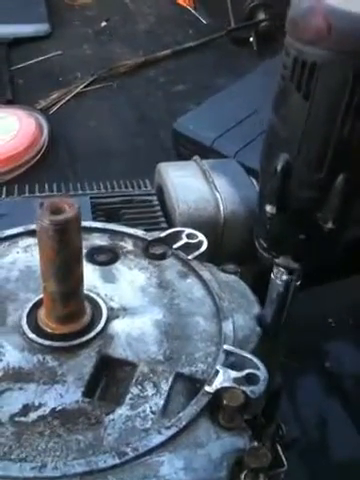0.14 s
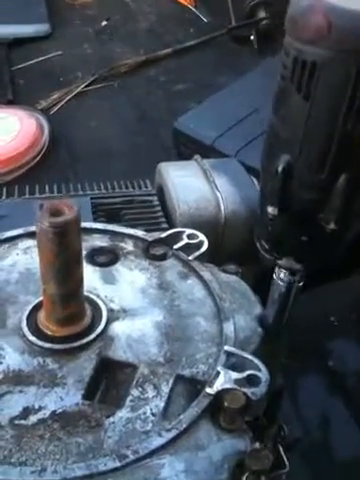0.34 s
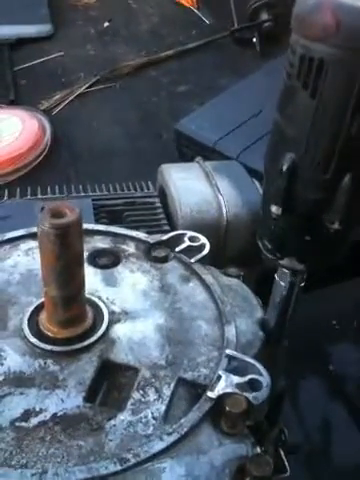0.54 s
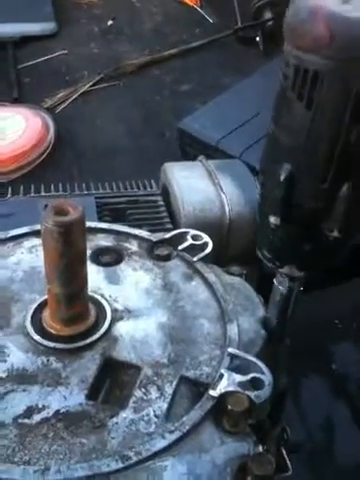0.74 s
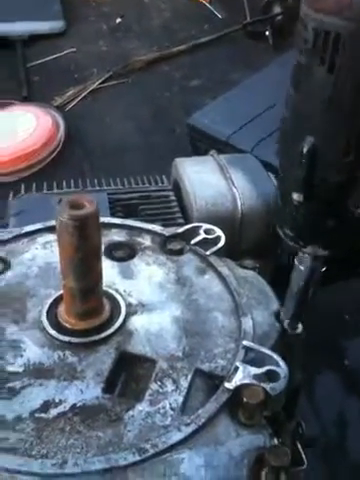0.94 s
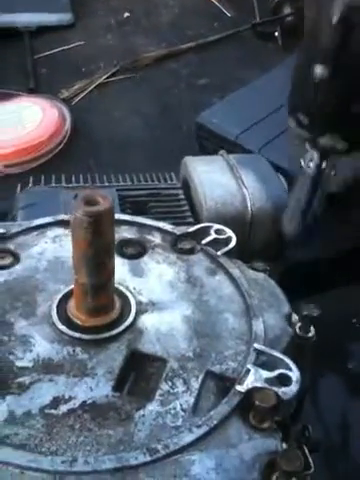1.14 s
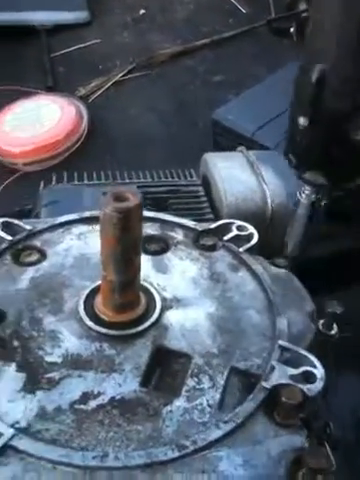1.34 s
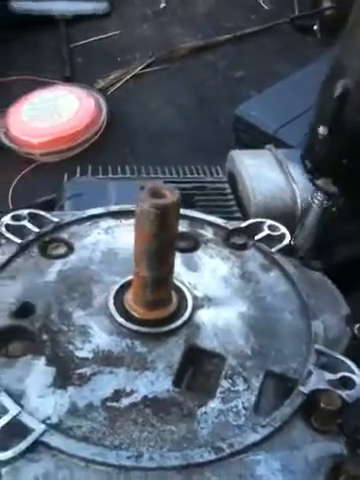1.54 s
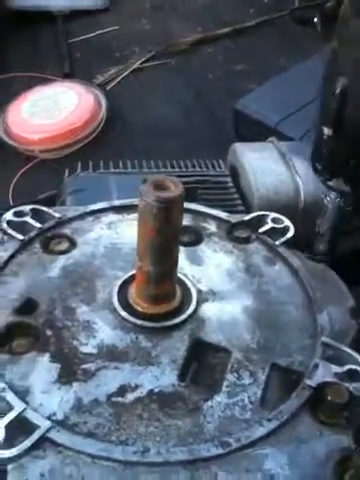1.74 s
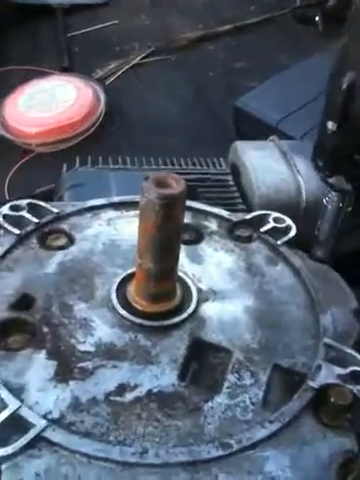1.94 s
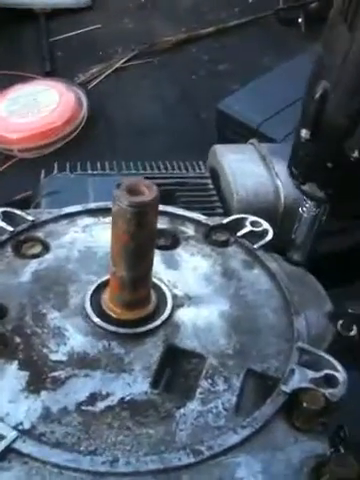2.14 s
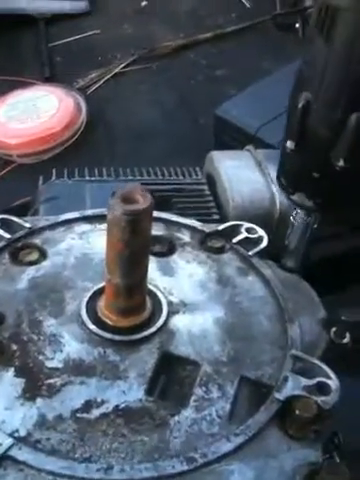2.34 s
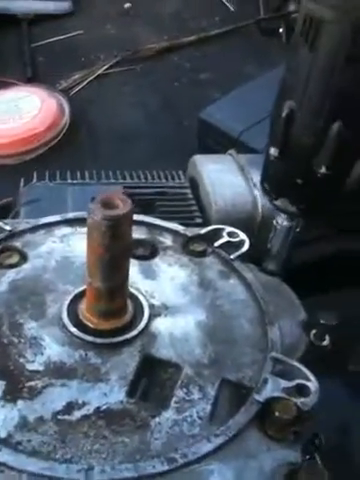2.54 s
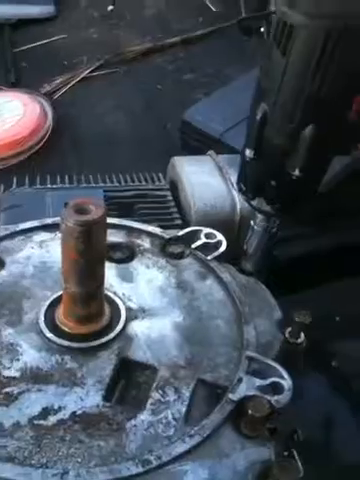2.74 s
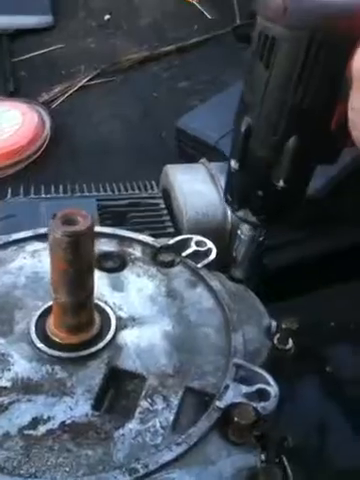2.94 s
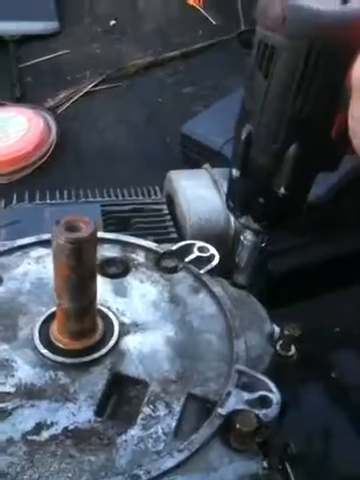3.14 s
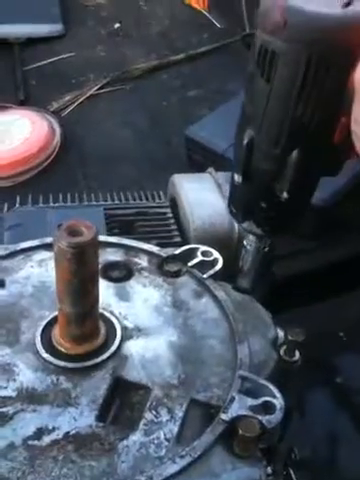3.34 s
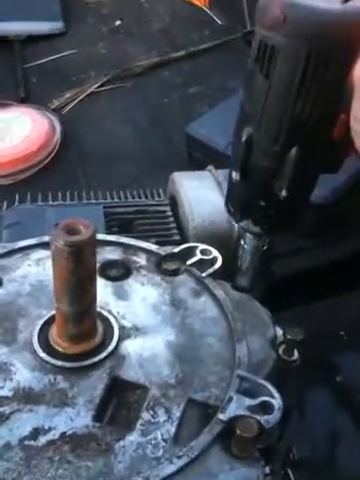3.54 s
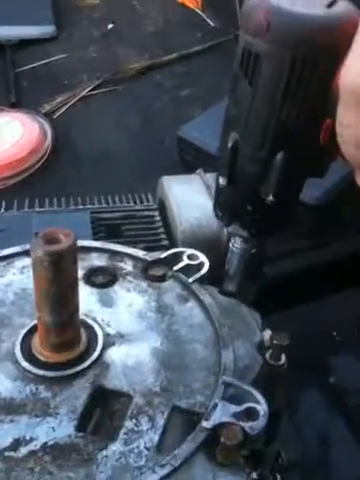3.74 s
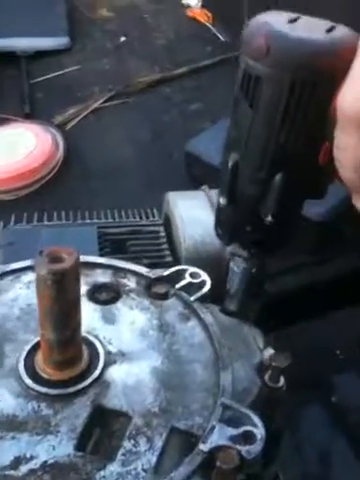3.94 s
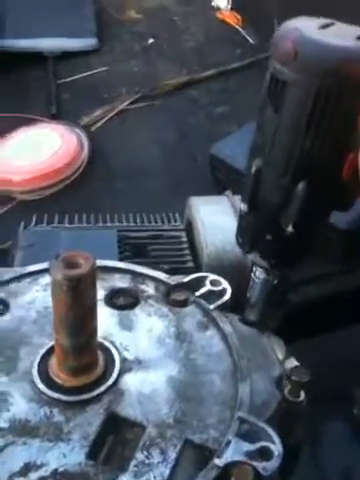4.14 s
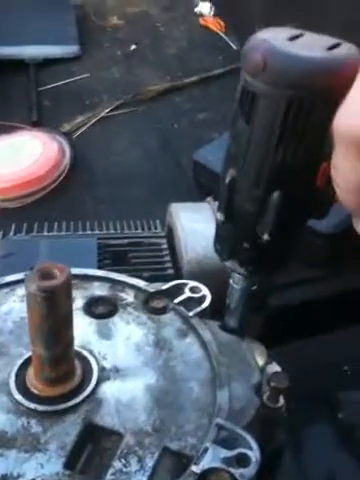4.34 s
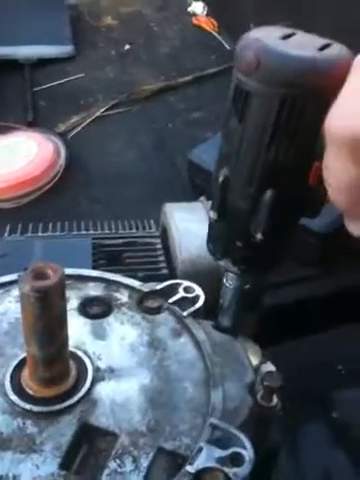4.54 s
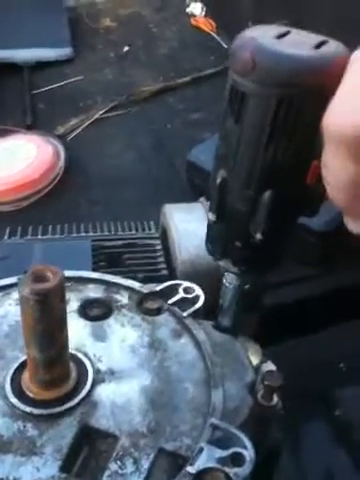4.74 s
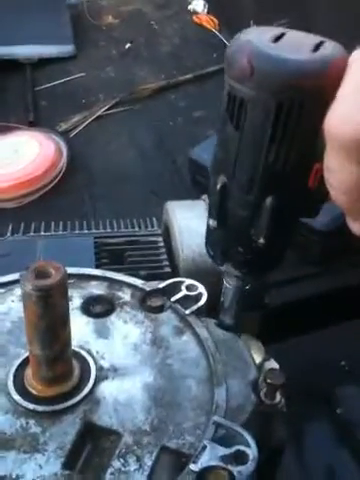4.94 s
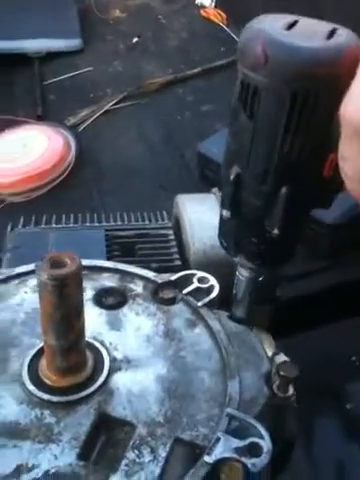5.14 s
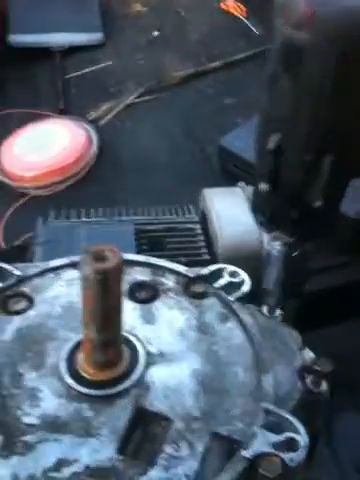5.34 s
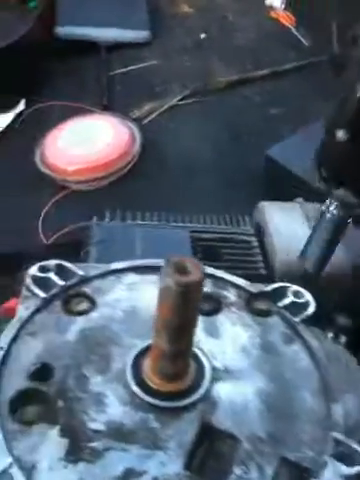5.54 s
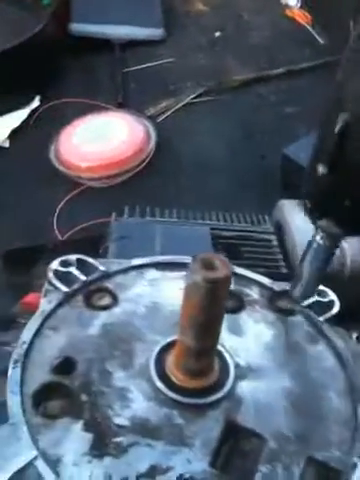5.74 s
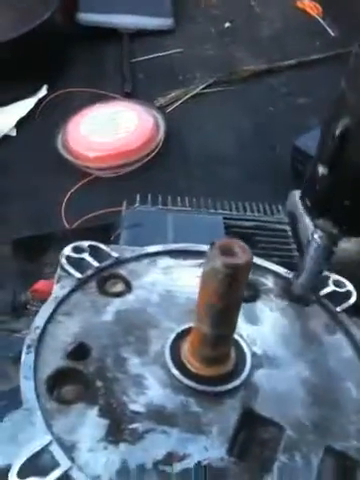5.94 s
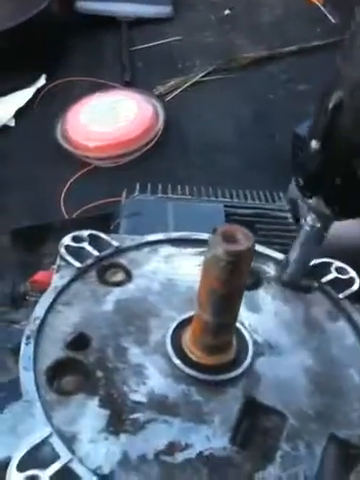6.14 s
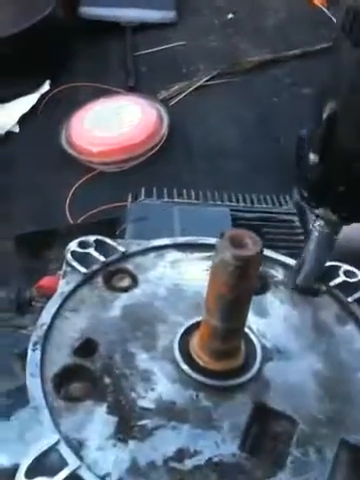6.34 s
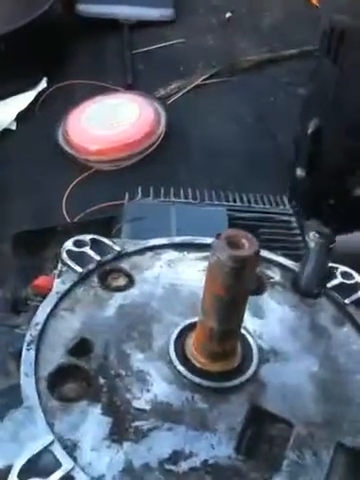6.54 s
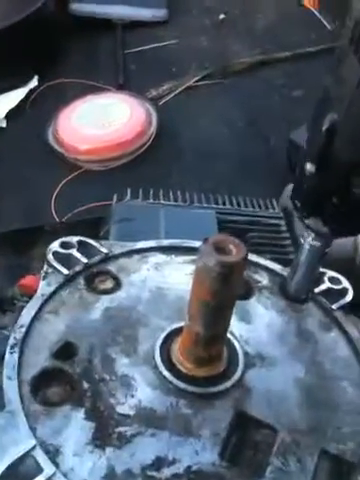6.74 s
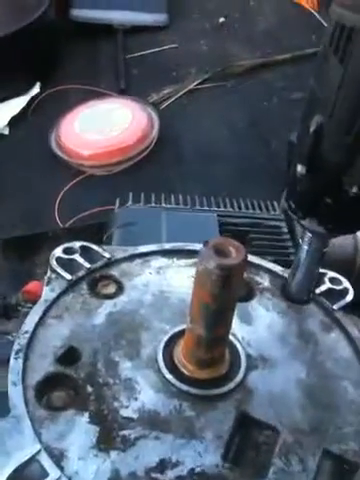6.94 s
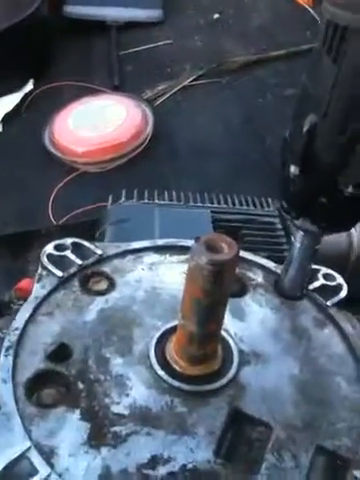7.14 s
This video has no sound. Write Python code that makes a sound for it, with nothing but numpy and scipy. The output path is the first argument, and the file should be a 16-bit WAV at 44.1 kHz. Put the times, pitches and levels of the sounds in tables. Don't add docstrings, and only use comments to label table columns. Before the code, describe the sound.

A cordless impact wrench hammers harshly in three bursts, its whine climbing as bolts loosen, with metallic socket clicks in the gaps.

```python
import sys
import numpy as np
from scipy import signal
from scipy.fft import rfft, irfft, next_fast_len
from scipy.io import wavfile
from scipy.ndimage import uniform_filter1d

SR = 44100
rng = np.random.default_rng(int(sys.argv[2]) if len(sys.argv) > 2 else 0)


def attenuation_scalar(level_db):
    decades = np.asarray(level_db, float) / 20
    return 10 ** decades


def transcribe(u):
    v = np.clip(np.atleast_2d(u).T, -1, 1)
    q = np.round(v * 32767).astype(np.int16)
    wavfile.write(sys.argv[1], SR, q)


N = 321312
T = np.arange(N) / SR

# frequency in Hz, level in dB per Hz.
YARD_NOISE = [(40, -56), (149, -5.5), (190, -15), (440, -19.5), (640, -21), (3200, -38), (6770, -33),
              (15600, -75)]
# frequency in Hz, level in dB.
MOTOR_HUM = [(120, -55.5), (150.5, -52), (204, -54.5), (296, -69.5), (447, -60)]
YARD_DB = -55

# time in seconds, length in seconds, push in dB, ripple in Hz.
AIR_PUFFS = [(0.028, 0.013, 8, 210), (0.199, 0.0093, 1, 230), (0.291, 0.0049, 0, 219.7),
             (0.36, 0.012, 8, 207.3), (0.45, 0.0064, -14, 260), (0.982, 0.018, -10, 205),
             (2.276, 0.013, 9.5, 200), (2.344, 0.0074, -1, 216.8), (2.632, 0.0094, 2, 350),
             (2.717, 0.011, -6, 202.6), (3.012, 0.0061, 7, 249), (3.267, 0.012, 1, 195.4),
             (3.758, 0.0094, 7, 230.6), (3.871, 0.0059, -0.5, 218), (4.241, 0.0074, -0.5, 209.5),
             (4.282, 0.007, -5.5, 221), (6.849, .008, -9.5, 217.6), (6.954, 0.0099, -7.5, 220)]
PUFF_RIPPLE, PUFF_FLUTTER, PUFF_HISS, PUFF_DB = 0.35, 0.15, 0.15, -5
BUFFET_DB = 3.5
FREE_BUFFET_DB = -9

# frequency in Hz, width in Hz, level in dB.
ENGINE_BLOCK = [(330, 130, -0.5), (660, 440, 4), (1150, 2230, 0.5)]
CASTING = [(1890, 23, 2), (2640, 1100, 0), (3296, 79, 1), (3236, 180, 0), (4025, 1710, 0), (4300, 51, 3.5)]
ANVIL = [(4120, 690, -8), (5525, 830, -2.5), (5760, 87, 6.5), (6123, 280, -5), (6450, 130, 6.5),
         (7110, 500, 0.5), (7170, 22, -2), (7130, 2820, -5)]
SOCKET = [(8220, 390, 1), (9000, 2870, 1.5), (10100, 3700, 2), (13000, 7300, -7.5)]
# frequency in Hz, level in dB, time to fall 60 dB in seconds.
STEEL_NOTES = [(610.2, -13, 0.08), (964, -8.5, 0.2), (1820, -10.5, 0.12), (2000, -9.5, 0.15),
               (2240, -2.5, 0.033), (3278, -31, 0.1), (3698, -36.5, 0.2), (4134, -13, 0.1),
               (4963, -16, 5.0), (5600, -2, 0.058), (5440, 3, 0.066), (5530, -12.5, 0.19),
               (7180, 23, 0.027), (7585, -9.5, 0.13)]

# time in seconds, peak in dB,
# brightest frequency in Hz, low share in dB, casting share in dB.
KNOCKS = [(1.4645, -7, 4700, -20, -26), (1.4711, -12.5, 4530, -15, -31), (1.6176, -6, 5310, -26.5, -33.5),
          (1.6209, -4, 7320, -34.5, -30), (1.9068, -25, 4300, -10, -13.5), (1.9154, -13, 9000, -14, -26),
          (2.119, -32, 4030, -23, -8), (2.131, -18, 2490, -12.5, -4.5), (2.1457, -1.5, 5900, -17, -21.5),
          (2.172, -1, 6450, -27, -13.5), (5.907, -6.5, 7490, -49, -5.5), (5.911, -21.5, 7140, -6.5, -1),
          (6.0065, -5.5, 6388, -28, -23), (6.0113, -9.5, 6320, -28.5, -5.5),
          (6.4426, -7.5, 6880, -35.5, -19.5), (6.6365, -27.5, 5260, -12, 1.5),
          (6.666, -8.5, 5960, -26.5, -4.5), (6.683, -0.5, 7170, -25.5, -4)]
# time in seconds, peak in dB, brightest Hz.
TICKS = [(1.5526, -25.5, 5860), (1.6917, -22.5, 5480), (1.7053, -30, 5130), (1.723, -21, 6260),
         (1.769, -33.5, 4470), (1.7882, -29, 4470), (1.817, -29.5, 6500), (1.94, -27, 4170),
         (1.9592, -26, 4640), (5.9418, -23, 2170), (6.0414, -26.5, 7080), (6.1365, -33, 7970),
         (6.1862, -26.5, 5200), (6.2133, -35, 2750), (6.2444, -42, 2760), (6.2706, -43, 2410),
         (6.4828, -17.5, 6760), (6.5151, -32, 2740), (6.5918, -31, 2540), (6.6102, -31, 6864)]
# time in seconds, peak in dB.
SETTLING = [(1.048, -14), (1.07, -28.5), (1.08, -30), (1.092, -30), (1.105, -36), (5.397, -11),
            (5.446, -18.5), (5.477, -19), (5.4969, -19), (5.5222, -29.5), (5.5301, -28.5)]
KNOCK_T60_S = 0.038
TICK_LOW_DB, TICK_CASTING_DB, TICK_T60_S = -12, -23, 0.02
SETTLE_HZ, SETTLE_LOW_DB, SETTLE_CASTING_DB, SETTLE_T60_S = 7200, -29.5, -29, 0.04
RING_DB, RING_MAX_T60_S, SOFT_RISE_S, HARD_RISE_S = -23, 0.155, 0.00047, 0.0027

# time in seconds, mesh frequency in Hz, whine level in dB.
PULLS = [
    [(0, 4498, -28), (.55, 4600, -25.5), (.635, 4970, -16), (.77, 5530, -19.5), (.8, 5617, -8.5),
     (.85, 5678, -10), (.915, 5720, -7.5)],
    [(2.15, 4256, -31), (2.9, 4370, -32), (4.1, 4543, -26.5), (4.74, 4602, -22), (4.9, 4792, -19.5),
     (4.97, 5200, -13.5), (5.056, 5628, -20), (5.22, 5760, -10.5), (5.32, 5777, -10.5)],
    [(6.68, 4433, -38), (6.87, 4560, -23), (7.01, 4620, -18), (7.125, 5017, -16.5), (7.185, 5236, -4.5),
     (7.28, 5674, -14)],
]
# when the trigger is let go, in seconds.
RELEASE_S = [.933, 5.327, 7.4]
GEARS = [1 / 3, 2 / 3, 11 / 15, 1, 2]
GEAR_DB = [-22, -25, -4.5, 0, -22]
GEAR_FREE_DB = [-8, 0, -35.5, -0.5, -3]
LOADED_HZ, FREE_HZ = 4600, 5730
WOBBLE, TIGHT_WOBBLE = 0.012, 0.004
SLIP_FLUTTER_DB = 4.5
BRAKE_S, BRAKE_FADE_S, BRAKE_OCTAVE_DB = 0.078, 0.041, 26

# time in seconds, blows per second.
BLOW_PACE = [(0, 48.3), (1, 34.7), (2.1, 52), (3.5, 47.2), (4.2, 42), (4.7, 43), (6.6, 46.6), (7.3, 47.5)]
# first blow in seconds, rattle in dB, casting share in dB,
# socket share in dB, engine block share in dB.
BURSTS = [
    (-.05, -10.5, -7.5, -8, -13),
    (2.18, -10, -7.5, -7.5, -14.5),
    (6.69, -10, -7.5, -6.5, -15),
]
BITE_DB, BITE_S = -3.5, 0.049
FREE_RATTLE_DB, FREE_CASTING_DB, FREE_BLOCK_DB = -5.5, 2, -8
BLOW_DEPTH, FREE_DEPTH = 0.5, 0.15
COAST_S, RATTLE_T60_S = 0.026, 0.18
SPIN_UP_S, SPIN_UP_DB, SPIN_UP_DB_PER_S = 0.05, -17, 158
SPIN_UP_SOCKET_DB = -16.5

DULL = signal.butter(6, 8600, fs=SR, output="sos")
STOP, KNEE, OVERDRIVE_DB = 0.59, 4.1, 5.5
BASS_CUT_HZ, BASS_CUT_DB, RUMBLE_CUT_HZ = 241, -10, 31
# frequency in Hz, level in dB.
TREBLE_KEPT = [(7000, -18), (8500, -8), (10500, -4), (13000, -2), (16000, -2.5)]
MASKING, DROPPED_DB = 0.4, -19
KEEP_FLOOR_DB, SUDDEN_DB = -91.5, 7


def level(x, db):
    return x * attenuation_scalar(db) / np.sqrt(np.mean(x ** 2))


def band(x, hz, width):
    return signal.lfilter(*signal.iirpeak(min(hz, 0.45 * SR), hz / width, fs=SR), x)


def ring(x, modes):
    return sum((-1) ** k * attenuation_scalar(db) * band(x, hz, width) for k, (hz, width, db) in enumerate(modes))


def walk(rate):
    k = int(SR / rate)
    steps = np.repeat(rng.standard_normal(N // k + 1), k)
    return 1.3 * uniform_filter1d(uniform_filter1d(steps, k), k)[:N]


def add(out, x, s):
    i = max(int(s * SR), 0)
    out[i:i + len(x)] += x[:len(out) - i]


def freeness(hz):
    return np.clip((hz - LOADED_HZ) / (FREE_HZ - LOADED_HZ), 0, 1)


def freeness_over_time():
    return freeness(np.interp(T, *np.concatenate(PULLS)[:, :2].T))


def bass_shelf(x, lift=False):
    size = next_fast_len(N, real=True)
    hz = np.fft.rfftfreq(size, 1 / SR) / BASS_CUT_HZ
    top = attenuation_scalar(BASS_CUT_DB) + 1.4j * hz * attenuation_scalar(BASS_CUT_DB / 2) - hz ** 2
    gain = top / (1 + 1.4j * hz - hz ** 2)
    spectrum = rfft(x, size)
    return irfft(spectrum / gain if lift else spectrum * gain, size)[..., :N]


def yard():
    hz, db = np.transpose(YARD_NOISE)
    noise = np.zeros(N)
    for f in 50 * 2 ** np.arange(0, 7.5, 0.5):
        flicker_db = np.interp(np.log(f), np.log(hz), db) + 1.4 * walk(5.1)
        noise += attenuation_scalar(flicker_db) * band(band(rng.standard_normal(N), f, f / 2), f, f / 2)
    hum = np.zeros(N)
    for f, g in MOTOR_HUM:
        turn = 2 * np.pi * np.cumsum(f * (1 + 0.018 * walk(30))) / SR
        hum += attenuation_scalar(g - 1.5 + 0.89 * walk(3.7)) * np.sin(turn)
    return bass_shelf(level(signal.sosfilt(DULL, noise), YARD_DB + 5.5) + hum, lift=True)


def cooling_air():
    running = sum((T > pull[0][0]) & (T < release) for pull, release in zip(PULLS, RELEASE_S))
    gusts = level(band(rng.standard_normal(N), 30, 55) * attenuation_scalar(BUFFET_DB * walk(7.2)), -26.5)
    out = gusts * uniform_filter1d(1.0 * running, size=900) * attenuation_scalar(FREE_BUFFET_DB * freeness_over_time())
    for s, length, db, hz in AIR_PUFFS:
        hiss = level(band(rng.standard_normal(SR // 20), 600, 900), 0)
        t = np.arange(-length, length, 1 / SR)
        ripple = PUFF_RIPPLE * np.cos(2 * np.pi * hz * t + 0.7)
        flutter = PUFF_FLUTTER * np.cos(2 * np.pi * 2.3 * hz * t)
        push = np.exp(-(2 * t / length) ** 6) * (1 + ripple + flutter + PUFF_HISS * hiss[:len(t)])
        direction = np.sign(hiss[-1])
        add(out, attenuation_scalar(db + PUFF_DB) * push * direction, s - length)
    return out


def touches():
    knocks = [(*k, KNOCK_T60_S) for k in KNOCKS]
    ticks = [(*k, TICK_LOW_DB, TICK_CASTING_DB, TICK_T60_S) for k in TICKS]
    settling = [(*k, SETTLE_HZ, SETTLE_LOW_DB, SETTLE_CASTING_DB, SETTLE_T60_S) for k in SETTLING]
    return knocks + ticks + settling


def steel_notes(t, chance):
    out = 0
    for (hz, db, t60), c in zip(STEEL_NOTES, chance):
        fall = attenuation_scalar(-60 * t / np.clip(t60, 0.02, RING_MAX_T60_S))
        out = out + attenuation_scalar(db + 3 * c) * fall * np.sin(2 * np.pi * hz * (1 + 0.01 * c) * t)
    return out


def clicks():
    out, t = np.zeros(N), T[:SR // 5]
    for s, db, hz, low_db, casting_db, t60 in touches():
        crack_noise, knock_noise, body_noise, chance = rng.standard_normal((4, len(t)))
        hard = np.clip((db + 15) / 6, 0, 1)
        rise = 1 - np.exp(-(t / (SOFT_RISE_S + (HARD_RISE_S - SOFT_RISE_S) * hard)) ** 2)
        fall = attenuation_scalar(-60 * t / np.clip(t60, 0.008, 0.4)) * rise
        crack = 4.17 * band(crack_noise, hz, 1200) + 0.3 * band(crack_noise, 9000, 6000)
        crack = signal.sosfilt(DULL, crack) + (0.25 + 0.6 * hard) * np.exp(-t / 0.004) * crack
        knock = attenuation_scalar(low_db + 16.5) * band(knock_noise, 510, 1000)
        knock += attenuation_scalar(casting_db + 8) * band(knock_noise, 2500, 1500)
        body = 0.67 * ring(body_noise, ANVIL) + attenuation_scalar(casting_db - 1.5) * ring(body_noise, CASTING)
        body += attenuation_scalar(low_db + 20.5) * (ring(knock_noise, ENGINE_BLOCK) + 2 * band(knock_noise, 640, 79))
        body += 0.42 * band(body_noise, hz, 1000)
        tail_fall = attenuation_scalar(-17 - 60 * t / (0.06 + 0.08 * hard)) * rise
        tail = tail_fall * signal.sosfilt(DULL, 1.8 * body + 0.5 * knock)
        notes = attenuation_scalar(RING_DB) * hard * steel_notes(t, chance) * rise
        click = notes + (crack + knock) * fall + tail
        add(out, click * attenuation_scalar(db - 8.5 + (OVERDRIVE_DB + 7) * hard), s - 0.001)
    return out


def whine():
    out = np.zeros(N)
    for pull, release in zip(PULLS, RELEASE_S):
        s, hz, db = np.transpose(pull)
        t = T[int(s[0] * SR):int((release + 0.2) * SR)]
        n = len(t)
        after = np.clip(t - release, 0, None)
        mesh = np.interp(t, s, hz)
        free = freeness(mesh)
        slip = np.clip(8 * free, 0, 1) * (1 - free) ** 0.5
        sag = np.sin(2 * np.pi * 24.5 * t) + 0.9 * walk(150)[:n]
        drag = np.clip((FREE_HZ - mesh) / 500, 0.05, 1) * (TIGHT_WOBBLE + WOBBLE * slip) * sag
        turn = 2 * np.pi * np.cumsum(mesh * np.exp(-after / BRAKE_S) * (1 + drag)) / SR
        octave_db = BRAKE_OCTAVE_DB * np.exp(-((after - 0.034) / 0.014) ** 2)
        fading = (after / BRAKE_FADE_S) ** 6
        lines = np.zeros(n)
        for k, gear_db, free_db in zip(GEARS, GEAR_DB, GEAR_FREE_DB):
            line_db = gear_db + free_db * free + octave_db * (k > 1) - 77 * (k <= 1) * fading
            line_db = line_db + (k != 1) * (after == 0) * 1.7 * walk(30)[:n]
            lines += attenuation_scalar(line_db) * np.sin(k * turn)
        stutter_db = 9 + 5 * np.cos(2 * np.pi * 95 * (after - 0.012))
        fade = np.exp(-fading) * attenuation_scalar(-np.clip(after / 0.006, 0, 1) * stutter_db)
        flutter_db = 2 * walk(90)[:n] + (0.45 + SLIP_FLUTTER_DB * slip) * walk(40)[:n]
        add(out, lines * fade * attenuation_scalar(np.interp(t, s, db) + 4 + OVERDRIVE_DB + flutter_db), s[0])
    return out


def hammer():
    phase = np.cumsum(np.interp(T, *np.transpose(BLOW_PACE)) * (1 + 0.04 * walk(20))) / SR
    strength = attenuation_scalar(4.5 * rng.standard_normal(400))
    blow = np.exp(-(phase % 1) / 0.47) * strength[phase.astype(int)]
    blow = uniform_filter1d(blow / blow.mean(), size=40)

    pull = np.searchsorted([b[0] - SPIN_UP_S for b in BURSTS[1:]], T)
    start, db, casting_db, socket_db, block_db = np.array(BURSTS)[pull].T
    release = np.array(RELEASE_S)[pull]
    free = np.where(T < release, freeness_over_time() * (T > start), 1)
    db = db + (T < start) * (SPIN_UP_DB + SPIN_UP_DB_PER_S * (T - start))
    db = db + BITE_DB * np.exp(-np.abs(T - start) / BITE_S) + FREE_RATTLE_DB * free
    db = db - 60 * np.clip(T - release - COAST_S, 0, 1) / RATTLE_T60_S
    depth = np.clip(BLOW_DEPTH + (FREE_DEPTH - BLOW_DEPTH) * free, 0, 1)

    parts = (
        (ENGINE_BLOCK, block_db + FREE_BLOCK_DB * free),
        (CASTING, casting_db - 1 + FREE_CASTING_DB * free),
        (ANVIL, 3),
        (SOCKET, socket_db + 1.6 + SPIN_UP_SOCKET_DB * (T < start)),
    )
    out = np.zeros(N)
    for modes, share_db in parts:
        chatter = rng.standard_normal(N) * attenuation_scalar(2.75 * rng.exponential(size=N))
        ringing = ring(chatter * (1 - depth + depth * blow), modes)
        out += level(ringing, 0) * attenuation_scalar(share_db + 0.97 * walk(25))
    return out * attenuation_scalar(db + OVERDRIVE_DB * np.clip((db + 19) / 10, 0, 1))


def thin_treble(x):
    hz, _, z = signal.stft(x, SR, window="cosine", nperseg=2048)
    power = np.abs(z) ** 2 + 1e-18
    whole = np.sqrt(np.mean(power, axis=-2, keepdims=True)) + attenuation_scalar(KEEP_FLOOR_DB)
    patch = np.sqrt(np.abs(uniform_filter1d(power, size=5, axis=-2)))
    around = np.sqrt(np.abs(uniform_filter1d(power, size=65, axis=-2)))
    sudden = whole > attenuation_scalar(SUDDEN_DB) * np.roll(whole, 1, axis=-1)
    sudden = sudden | np.roll(sudden, 1, axis=-1)
    needed = attenuation_scalar(np.interp(hz, *np.transpose(TREBLE_KEPT)))[:, None]
    strong = patch > whole ** MASKING * around ** (1 - MASKING) * needed
    z = z * np.where(strong | sudden, 1, attenuation_scalar(DROPPED_DB))
    return signal.istft(z, SR, window="cosine", nperseg=2048)[1][..., :N]


def scene():
    tool = whine() + hammer() + clicks()
    t = T[:int(0.3 * SR)]
    echoes = rng.standard_normal(len(t)) * attenuation_scalar(-60 * t / 0.13) * (t > 0.004)
    clutter = level(signal.sosfilt(DULL, echoes), -20.5) / np.sqrt(len(t))
    mono = yard() + cooling_air() + tool + signal.fftconvolve(tool, clutter)[:N]
    return np.array([mono, mono])


def top_cut(x):
    return signal.sosfilt(signal.butter(12, 15710, fs=SR, output="sos"), x)


def record(dry):
    over = signal.resample_poly(dry[:1], 2, 1, axis=1) / STOP
    squashed = STOP * over / (1 + np.abs(over) ** KNEE) ** (1 / KNEE)
    squashed = signal.resample_poly(squashed, 1, 2, axis=1)
    rumble_cut = signal.butter(1, RUMBLE_CUT_HZ, "high", fs=SR)
    thinned = thin_treble(signal.lfilter(*rumble_cut, bass_shelf(squashed)))
    return top_cut(np.repeat(thinned, 2, axis=0))


dry = scene()
out = record(dry)
transcribe(out)
```